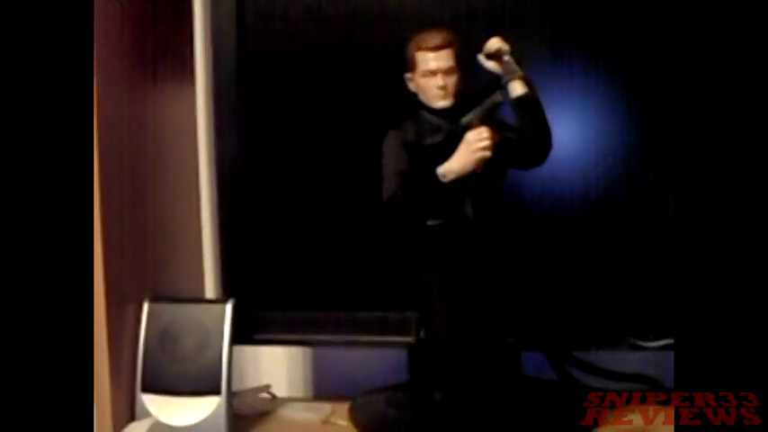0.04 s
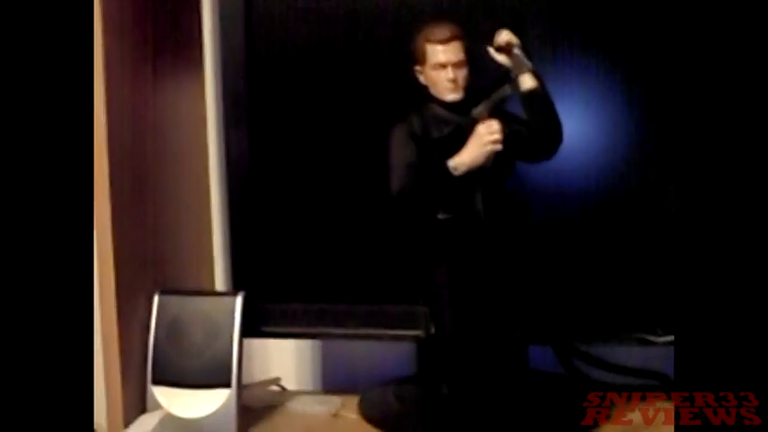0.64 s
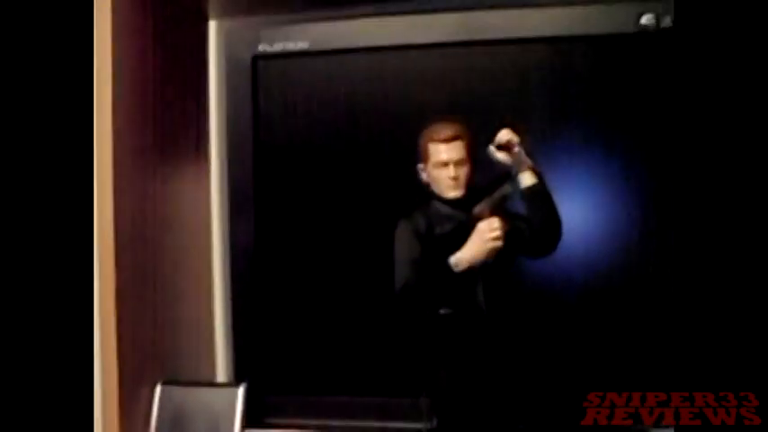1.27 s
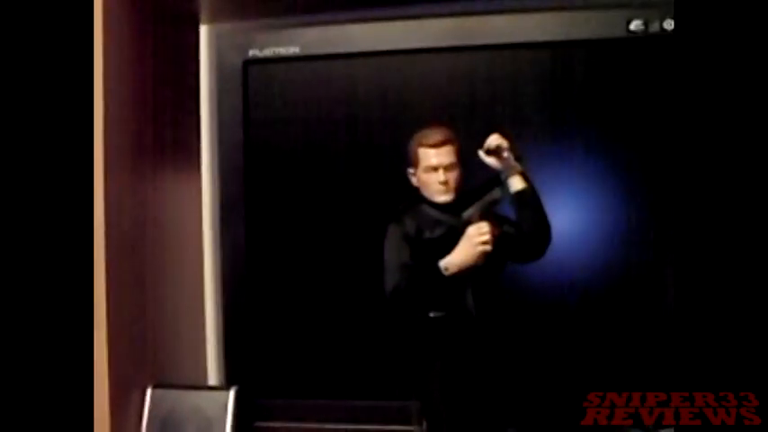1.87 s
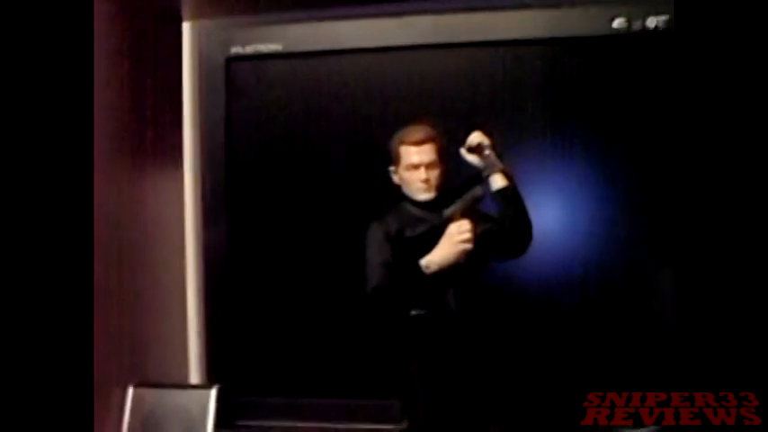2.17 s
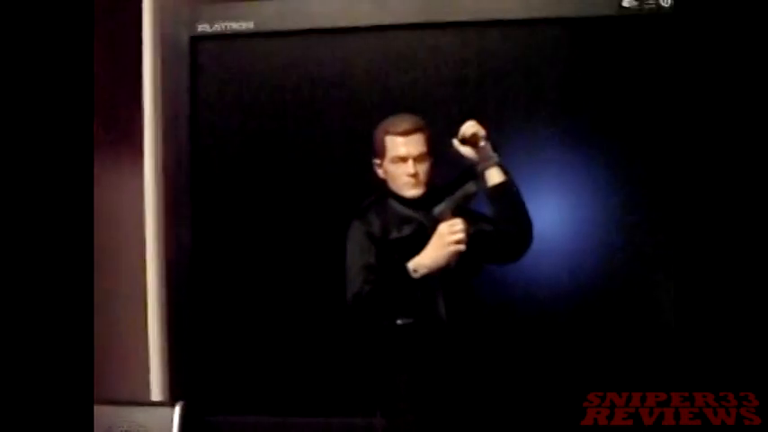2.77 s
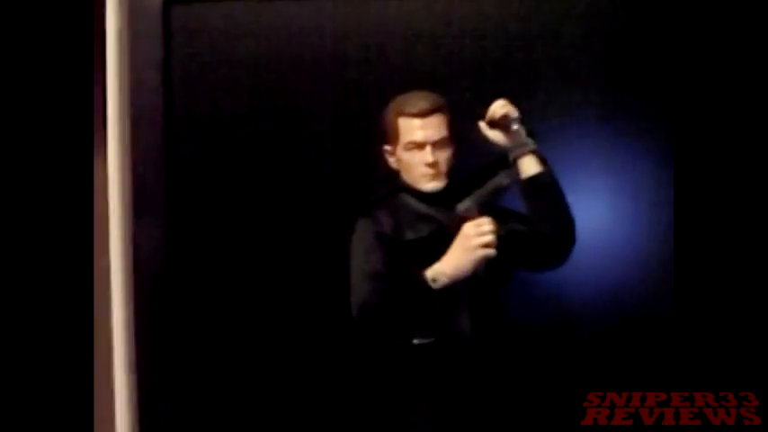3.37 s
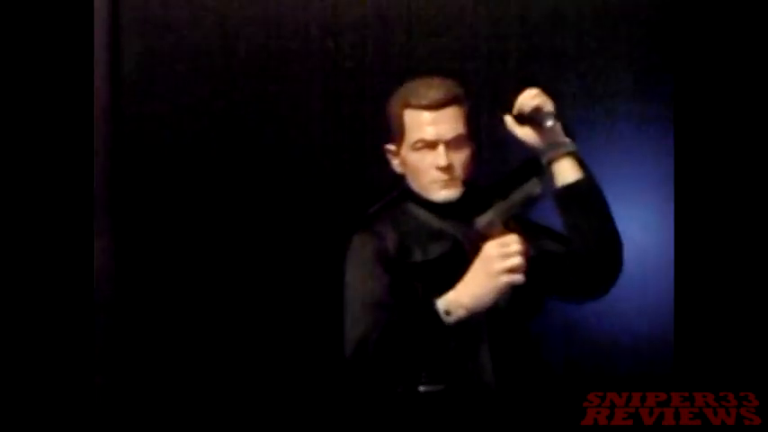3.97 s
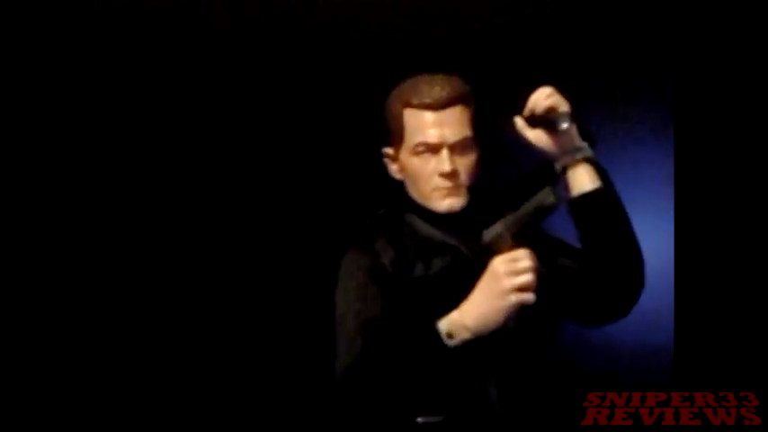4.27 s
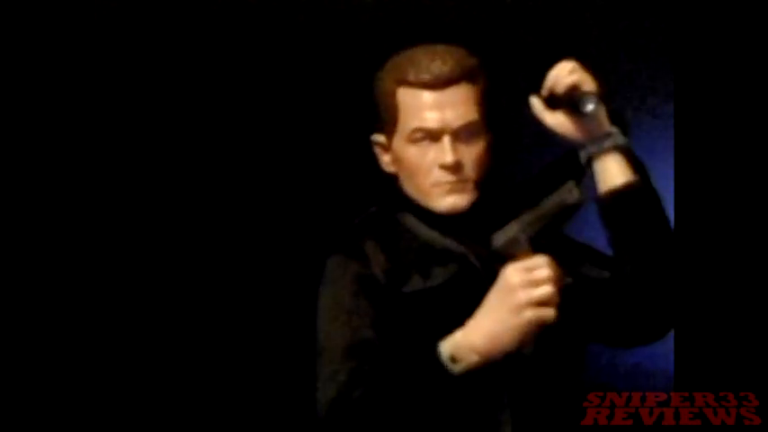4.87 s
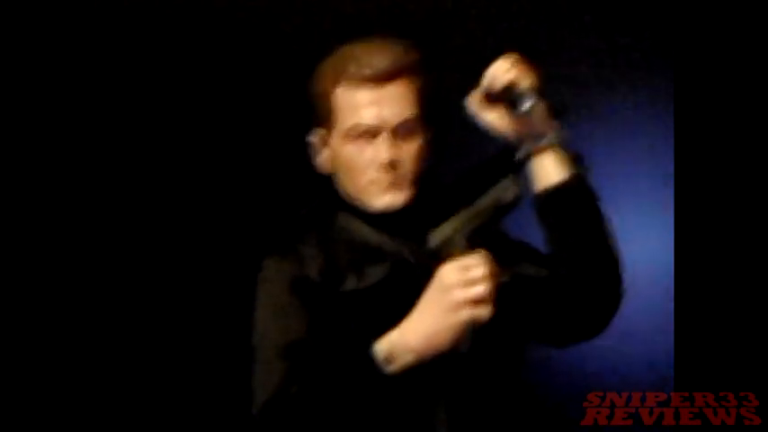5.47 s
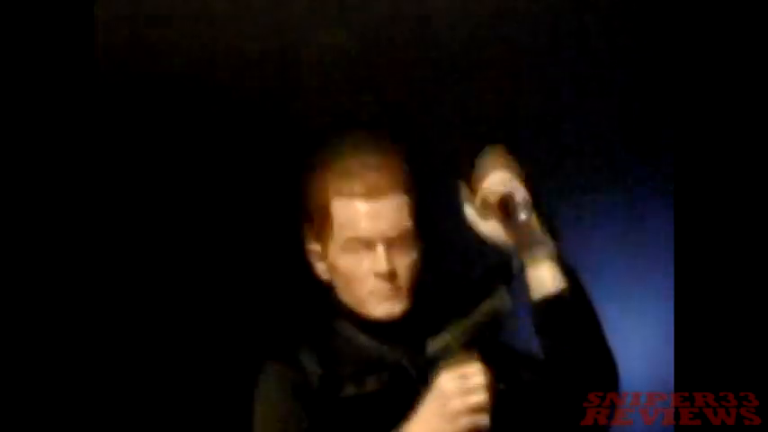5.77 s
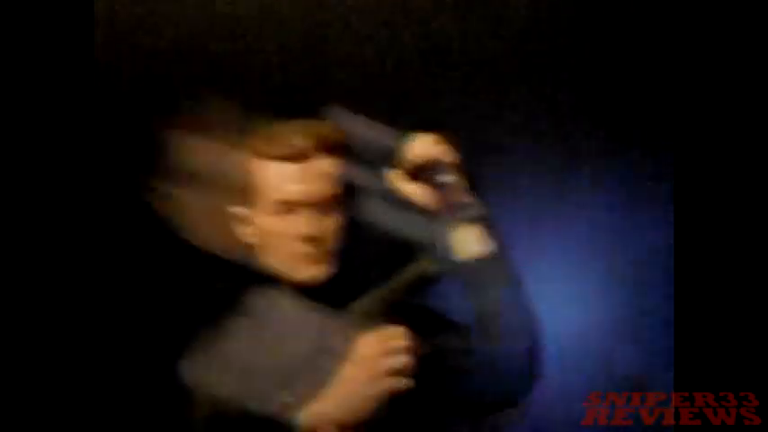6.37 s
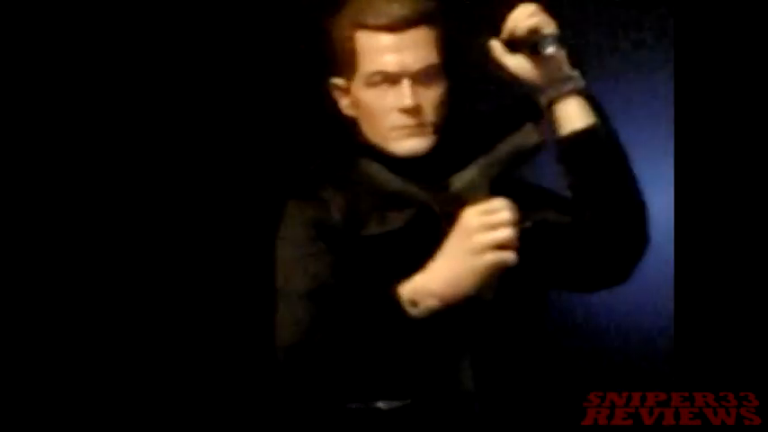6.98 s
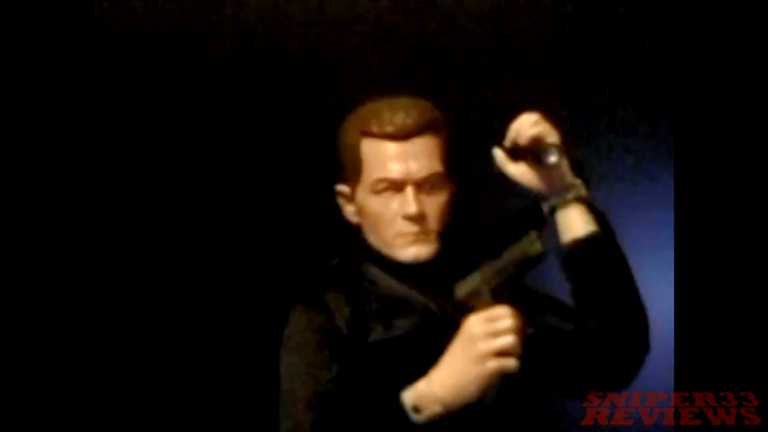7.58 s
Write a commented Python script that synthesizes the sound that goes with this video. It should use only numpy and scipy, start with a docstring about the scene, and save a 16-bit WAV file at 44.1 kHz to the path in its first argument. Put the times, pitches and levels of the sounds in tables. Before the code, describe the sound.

Fingers tap, creak and rub on a handheld camcorder's plastic shell, with two loud cracks over faint motor whir and room hiss.

```python
"""Fingers tap, slip and rub on the plastic shell of a hand-held camcorder, ringing its modes;
twice the case cracks loudly. Its small motors whir and whine beside the microphone, over the
faint rumble and hiss of a quiet room and the amplifier. The loudest clicks overload and duck
the gain, and a copy a few milliseconds late makes everything sound hollow."""
import sys
import numpy as np
from scipy import signal
from scipy.fft import rfft, irfft, next_fast_len
from scipy.io import wavfile
from scipy.ndimage import uniform_filter1d

SR = 44100
rng = np.random.default_rng(int(sys.argv[2]) if len(sys.argv) > 2 else 0)


def waveform_to_disk(signal):
    """Save audio, clipped to [-1, 1], as 16-bit WAV at the path in sys.argv[1]."""
    frames = np.transpose(np.atleast_2d(signal))
    scaled = np.clip(frames, -1, 1) * 32767
    samples = np.round(scaled).astype(np.int16)
    wavfile.write(sys.argv[1], SR, samples)


N = 340452
TIME = np.arange(N) / SR


def from_db(db):
    """Decibels to gain."""
    return 10 ** (np.asarray(db) / 20)


def unit_rms(x):
    """Scale to unit power."""
    return x / np.sqrt(np.mean(x ** 2) + 1e-20)


def bandpass(x, low_hz, high_hz, order):
    """Butterworth band-pass."""
    return signal.sosfilt(signal.butter(order, [low_hz, high_hz], "band", fs=SR, output="sos"), x)


def lowpass(x, high_hz, order):
    """Butterworth low-pass."""
    return signal.sosfilt(signal.butter(order, high_hz, fs=SR, output="sos"), x)


def colour(x, spectrum):
    """Minimum-phase filter through (freq_hz, gain_db) points; unit-rms output."""
    size = next_fast_len(2 * len(x))
    hz, db = np.transpose(spectrum)
    bins_hz = np.maximum(np.arange(size // 2 + 1) * SR / size, 1)
    gain = from_db(np.interp(np.log(bins_hz), np.log(hz), db))
    cepstrum = irfft(np.log(gain), size)
    cepstrum[1:size // 2] *= 2
    cepstrum[size // 2 + 1:] = 0
    response = np.exp(rfft(cepstrum))
    return unit_rms(irfft(rfft(x, size) * response, size)[:len(x)])


def drift(rate_hz):
    """Slow random motion, unit rms."""
    hop, warmup = 40, 2000
    pole = np.exp(-2 * np.pi * rate_hz * hop / SR)
    noise = rng.standard_normal(N // hop + warmup + 2)
    slow = signal.lfilter([1], [1, -2 * pole, pole * pole], noise)[warmup:]
    return np.interp(np.arange(N) / hop, np.arange(len(slow)), unit_rms(slow))


def mode(force, pitch_hz, t60_s):
    """Resonator: a unit click starts a dying sine."""
    radius, angle = from_db(-60 / (t60_s * SR)), 2 * np.pi * pitch_hz / SR
    return signal.lfilter([0, np.sin(angle)], [1, -2 * radius * np.cos(angle), radius * radius], force)


def swells(rows, fade_s, rest_db):
    """Gain that fades up from rest, holds and fades down for each row."""
    power = np.full(N, from_db(rest_db) ** 2)
    for start_s, length_s, level_db in rows:
        inside_s = np.minimum(TIME - start_s, start_s + length_s - TIME)
        power += (from_db(level_db) * np.clip(.5 + inside_s / fade_s, 0, 1)) ** 2
    return np.sqrt(power)


def slips(rate_hz, spread_db, clump_db):
    """Stick-slip friction: tiny uneven clicks in clumps."""
    sizes = from_db(spread_db * np.minimum(rng.exponential(1, N), 4))
    signs = rng.choice([-1, 1], N)
    slipping = rng.random(N) < rate_hz / SR
    return sizes * signs * slipping * from_db(clump_db * drift(25))


# Skin dragging on the shell: freq_hz, gain_db
GRIP_SPECTRUM = [(120, -4.5), (330, 2.5), (600, 1.5), (720, 1.5), (840, 4.5), (960, -15), (1300, -2.5),
                 (1700, -40), (2600, -18.5), (4000, -24.5), (5500, -30), (10000, -40.5), (15000, -54.5)]
# Shifts of the hand: start_s, length_s, level_db
GRIP_SHIFTS = [(0, 0.41, -55), (.42, 0.32, -61.5), (1.08, 0.52, -54.5), (1.83, 0.24, -59.5),
               (4.76, 0.33, -58.5), (5.24, 0.2, -59), (5.58, 0.25, -64), (6.26, 0.13, -56),
               (6.91, 0.45, -62), (7.66, .1, -53)]


def grip(waver_db=2.0, creak_db=-8.0):
    """The palm creeps over the shell, which rings under each slip; rarer slips make tiny creaks."""
    pressure = swells(GRIP_SHIFTS, fade_s=.041, rest_db=-72.5) * from_db(waver_db * drift(6))
    rubbing = colour(slips(rate_hz=1400, spread_db=4.0, clump_db=4.0), GRIP_SPECTRUM)
    rare_slips = slips(rate_hz=60, spread_db=2.5, clump_db=2.5)
    creaking = unit_rms(mode(rare_slips + 1e-18, pitch_hz=850, t60_s=.04))
    return pressure * (rubbing + from_db(creak_db) * creaking)


# The motor's whine swells and rises slightly in pitch: start_s, length_s, level_db (before boost_db)
WHINE_SWELLS = [(2.05, 0.68, -69.5), (3.15, 0.34, -75), (4.85, .3, -75.5), (6.45, .4, -62),
                (6.95, 0.57, -71), (7.5, .4, -65)]


def motor_whine(idle_hz=1616, hz_per_db=1.47, idle_db=-76, boost_db=2.5, overtone_db=-78):
    """Harmonics 7 and 8 of the turning rate; the motor speeds up as it grows louder."""
    wander_hz, flutter_db = .99, .8
    swell = swells(WHINE_SWELLS, fade_s=.24, rest_db=idle_db)
    pitch_hz = idle_hz + hz_per_db * (20 * np.log10(swell) - idle_db) + wander_hz * drift(6)
    phase = 2 * np.pi * np.cumsum(pitch_hz) / SR
    whine = from_db(boost_db + flutter_db * drift(12)) * swell * np.sin(phase)
    overtone = from_db(overtone_db) * np.sin(phase * 8 / 7)
    return np.sqrt(2) * (whine + overtone)


# Steady motor tones: pitch_hz, level_db, width_hz
WHIR_BANDS = [(56.2, -71.5, 2.5), (192, -73, 8.1), (292.5, -73, 5.8), (399, -72, 2), (756, -73, 9.8),
              (1040, -84, 5.6), (1204, -69, 3), (1535, -76, 7.7), (1561, -77, 3.3), (2720, -87.5, 14),
              (2984, -82, 25), (3460, -90, 24)]


def motor_whir():
    """Running motors: narrow bands of noise."""
    out = np.zeros(N)
    for pitch_hz, level_db, width_hz in WHIR_BANDS:
        phase = 2 * np.pi * pitch_hz * TIME
        out += from_db(level_db) * (drift(width_hz) * np.cos(phase) + drift(width_hz) * np.sin(phase))
    return out


# Room, motor and amplifier noise: freq_hz, gain_db
FLOOR_SPECTRUM = [(20, 1.5), (55, -3.5), (110, -5.5), (160, -6.5), (215, -2), (300, -7), (420, -11.5),
                  (750, -11.5), (1000, -14.5), (1800, -14), (2300, -24.5), (3100, -20.5), (4200, -33.5),
                  (10000, -38.5)]


def noise_floor(level_db=-59):
    """Steady rumble and hiss."""
    noise = colour(rng.standard_normal(N), FLOOR_SPECTRUM)
    return from_db(level_db) * lowpass(noise, high_hz=10020, order=10)


# Crisp tick of hard plastic: freq_hz, gain_db
TICK_SPECTRUM = [(2000, -27.5), (3800, -1.5), (5500, 0.5), (6600, -0.5), (8500, 0.5), (11000, -6),
                 (14000, -9.5), (17000, -12.5)]
# Small metal parts inside: pitch_hz, gain_db, t60_s
METAL_MODES = [(3700, -22.5, 0.083), (4840, -30, .15)]


def plastic_tick(tick_db, slip_s, t):
    """A burst of tiny cracks leaves the metal parts ringing faintly."""
    rise_s, decay_s = .00024 + .5 * slip_s, .00027 + slip_s
    envelope = np.exp(-t / decay_s) * (1 - np.exp(-t / rise_s))
    burst = colour(rng.standard_normal(len(t)) * envelope, TICK_SPECTRUM)
    top_hz = np.interp(tick_db, [-55, -30], [11500, 17000])   # harder snaps reach higher
    tick = bandpass(burst, low_hz=1520, high_hz=top_hz, order=7)
    strength = np.sqrt(np.sum(tick ** 2) / (.02 * SR))
    impulse = 1.0 * (t == 0)
    pings = sum(from_db(db) * mode(impulse, hz, t60_s) for hz, db, t60_s in METAL_MODES)
    return tick + strength * pings


# Case modes, whole body to small parts: pitch_hz, gain_db, t60_s
SHELL_MODES = [(404, -2.5, 0.034), (469, -4.5, 0.015), (632, 6, 0.019), (740, -4, 0.02), (850, 7.5, 0.026),
               (1007, -7, 0.02), (1130, 1.5, .016), (1330, -8.5, .011), (1590, 8, 0.004),
               (1950, -7, 0.0044), (2550, -9, 0.0053), (3020, 1, 0.0068), (3530, -8.5, .010),
               (3850, -13.5, 0.01)]
# Upper edges of the mode groups: thud_hz, ring_hz, clack_hz
REGISTER_TOPS_HZ = (700, 1400, 5000)


def contact(start_s, thud_db, ring_db, clack_db, tick_db, slip_s, spot_hz):
    """A push and a chatter of slips excite the case, with a tick on top; levels are rms over 20 ms."""
    size, chatter, spot_db, spot_width = 9000, .61, 16.0, .09
    t = np.arange(size) / SR
    # A brief contact is one push; a long one swells into a creak.
    force = rng.standard_normal(size) * np.sqrt(t / slip_s) * np.exp(-1.5 * t / slip_s)
    force *= chatter * slip_s / .0016 / np.linalg.norm(force)
    force[0] += 1
    registers = np.zeros((3, size))
    for pitch_hz, gain_db, t60_s in SHELL_MODES:
        # The touched spot favours modes near spot_hz.
        favour = np.exp(-(np.log(pitch_hz / spot_hz) / spot_width) ** 2)
        register = np.searchsorted(REGISTER_TOPS_HZ, pitch_hz)
        registers[register] += from_db(gain_db + spot_db * favour) * mode(force, pitch_hz, t60_s)
    thud, ring, clack = registers
    clack_top_hz = np.interp(tick_db - clack_db, [-28, -15], [2300, 4600])   # padded touches are dull
    # Soft skin: each register swells over about one cycle.
    parts = np.array([bandpass(thud, low_hz=250, high_hz=950, order=2),
                      bandpass(ring, low_hz=424, high_hz=1680, order=2),
                      bandpass(clack, low_hz=1082, high_hz=clack_top_hz, order=3),
                      plastic_tick(tick_db, slip_s, t)])
    parts_rms = np.sqrt(np.sum(parts ** 2, axis=1) / (.02 * SR))
    gains = from_db([thud_db, ring_db, clack_db, tick_db]) / parts_rms
    return np.pad(gains @ parts, (int(start_s * SR), N))[:N]


# Squeezes of the shell: start_s, ring_db, slip_s, spot_hz
SQUEEZES = [(0.038, -46, 0.0029, 1300), (0.052, -50.5, 0.011, 1010), (0.115, -45, 0.0037, 1050),
            (0.157, -44.5, 0.0025, 1170), (0.18, -46.5, 0.0043, 920), (1.033, -49, 0.0011, 840),
            (1.183, -36.5, 0.007, 850), (1.423, -51, 0.0038, 840), (1.476, -42.5, 0.0026, 870),
            (1.544, -43, 0.0093, 890), (1.558, -43.5, 0.0031, 1170), (4.934, -52, 0.0033, 840),
            (6.2805, -42, .0036, 780), (7.6487, -38, 0.0026, 850)]
# Creak mix relative to the ring: thud_db, clack_db, tick_db
CREAK_OFFSETS_DB = (-11, -15, -33)


def creaks():
    """The squeezed shell sticks and slips."""
    thud_db, clack_db, tick_db = CREAK_OFFSETS_DB
    return sum(contact(start_s, db + thud_db, db, db + clack_db, db + tick_db, slip_s, spot_hz)
               for start_s, db, slip_s, spot_hz in SQUEEZES)


# Fingertip landings: start_s, ring_db, spot_hz
LANDINGS = [(0.2, -46.5, 894), (0.211, -50.5, 775), (0.368, -53.5, 920), (0.935, -56, 850),
            (3.746, -53, 925), (4.9905, -42, 620), (5.097, -51.5, 830), (5.366, -53, 814),
            (5.449, -50.5, 820), (5.582, -46.5, 837), (6.351, -52.5, 890), (6.812, -51.5, 925),
            (6.938, -57.5, 794), (7.2, -38, 870), (7.252, -39.5, 1056)]
# Bump mix relative to the ring: thud_db, clack_db, tick_db
BUMP_OFFSETS_DB = (0, -27, -41.5)


def bumps(slip_s=.0015):
    """A soft fingertip lands: mostly thud and ring."""
    thud_db, clack_db, tick_db = BUMP_OFFSETS_DB
    return sum(contact(start_s, db + thud_db, db, db + clack_db, db + tick_db, slip_s, spot_hz)
               for start_s, db, spot_hz in LANDINGS)


# Light clicks: start_s, ring_db, thud_db, tick_db (last two relative to the ring)
LIGHT_CLICKS = [(0.391, -55.5, 7.5, -16), (1.9336, -48.5, -11, -23), (2.028, -50, -2, -32),
                (2.1753, -47, -13, -27.5), (2.384, -52.5, 3, -30), (3.205, -65, 5, -12),
                (4.132, -49.5, 3.5, -28.5), (4.196, -54, -6, -31), (4.4, -48, 2.5, -13.5),
                (4.4441, -42.5, 6, -18.5), (5.547, -48.5, 0, -29), (5.642, -48, 1.5, -31),
                (5.934, -46.5, 0, -35)]


def clicks(clack_db=-3.5, slip_s=.0005, spot_hz=1000):
    """Buttons and loose parts strike the case briefly."""
    return sum(contact(start_s, db + thud_db, db, db + clack_db, db + tick_db, slip_s, spot_hz)
               for start_s, db, thud_db, tick_db in LIGHT_CLICKS)


# Scrape of textured plastic: freq_hz, gain_db
SCRAPE_SPECTRUM = [(300, -32), (650, -4), (950, 2), (1600, 0.5), (2500, -8.5), (3700, -12), (5500, -25),
                   (12000, -30)]
# Hiss of sliding skin: freq_hz, gain_db
SKIN_SPECTRUM = [(2000, -22), (2900, 4), (3700, -3), (4600, 4), (6500, -6.5), (9000, 6), (11000, 5),
                 (12500, 0), (15000, -40)]
# Strokes near the microphone: start_s, rise_s, scrape_db, hiss_db
FINGER_STROKES = [(1.886, 0.012, -35.5, -45), (2.004, 0.032, -56, -65.5), (2.125, .033, -63, -69.5),
                  (2.185, .032, -57.5, -88), (2.257, 0.031, -52.5, -71)]


def strokes(sharpness=1.6):
    """A fingertip drags in fine, fast slips; each stroke speeds up, then runs out."""
    scrape_gain, hiss_gain = np.zeros(N), np.zeros(N)
    for start_s, rise_s, scrape_db, hiss_db in FINGER_STROKES:
        age = np.clip((TIME - start_s) / rise_s, 0, 20)
        speed = (age * np.exp(1 - age)) ** sharpness
        scrape_gain += from_db(scrape_db) * speed
        hiss_gain += from_db(hiss_db) * speed
    friction = slips(rate_hz=6900, spread_db=3.5, clump_db=2.5)
    scrape = scrape_gain * colour(friction, SCRAPE_SPECTRUM)
    hiss = hiss_gain * colour(friction, SKIN_SPECTRUM)
    return bandpass(scrape + hiss, low_hz=200.3, high_hz=12800, order=8)


# Knocks and cracks: start_s, thud_db, ring_db, clack_db, tick_db, slip_s, spot_hz
HARD_CONTACTS = [(1.8895, -55, -38, -48, -57, 0.0042, 1040), (2.4848, -39, -44, -56, -63.5, 0.0084, 804),
                 (3.8685, -38.5, -47, -37.5, -64.5, 0.00085, 1330),
                 (4.4842, -28.5, -26.5, -27, -52, 0.0014, 1510),
                 (4.5045, -51, -18.5, -21.5, -22.5, 0.0014, 757),
                 (4.5075, -36, -22, -33.5, -35.5, .00045, 820),
                 (6.2866, -20.5, -21, -32.5, -47.5, 0.0015, 764),
                 (6.2885, -25.5, -46, -37, -51, 0.0026, 400), (6.304, -35, -42.5, -53, -68.5, 0.0055, 756)]


def knocks():
    """Hard contacts ring the case; two tight clusters make the loud cracks."""
    return sum(contact(*row) for row in HARD_CONTACTS)


def room(x, t60_s=.16, gain_db=-31.5, predelay_s=.008):
    """Faint, dull tail from the walls."""
    t = TIME[:SR // 2]
    tail = rng.standard_normal(len(t)) * from_db(-60 * t / t60_s) * (t > predelay_s)
    tail = lowpass(tail / np.linalg.norm(tail), high_hz=4000, order=2)
    return from_db(gain_db) * signal.fftconvolve(x, tail)[:N]


def scene():
    """Hand and motors right beside the microphone, mono."""
    hand = knocks() + clicks() + bumps() + creaks() + grip() + strokes()
    return (hand + room(hand) + motor_whine() + motor_whir() + noise_floor())[None]


def record(dry, threshold_db=-11.5, release_db_per_s=19.0, attack_s=.028):
    """Gain control ducks after loud clicks and creeps back; then soft clip, comb and low-pass."""
    ceiling, echo_s, echo_gain, cutoff_hz = .33, .003775, .69, 16300
    power = uniform_filter1d(dry[0] ** 2, size=64)
    level_db = 10 * np.log10(np.maximum(power, 1e-12))
    excess_db = np.maximum(level_db - threshold_db, 0)
    release_db = release_db_per_s * TIME
    target_db = np.maximum.accumulate(excess_db + release_db) - release_db
    pole = np.exp(-1 / (attack_s * SR))
    duck_db = signal.lfilter([1 - pole], [1, -pole], target_db)
    ducked = dry[0] * from_db(-duck_db)
    clipped = ceiling * np.tanh(ducked / ceiling)
    hollow = clipped + echo_gain * np.interp(TIME - echo_s, TIME, clipped, left=0)
    top_cut = signal.ellip(10, .1, 80, cutoff_hz, fs=SR, output="sos")
    return signal.sosfilt(top_cut, hollow)[None]


dry = scene()
out = record(dry)
waveform_to_disk(out)
```